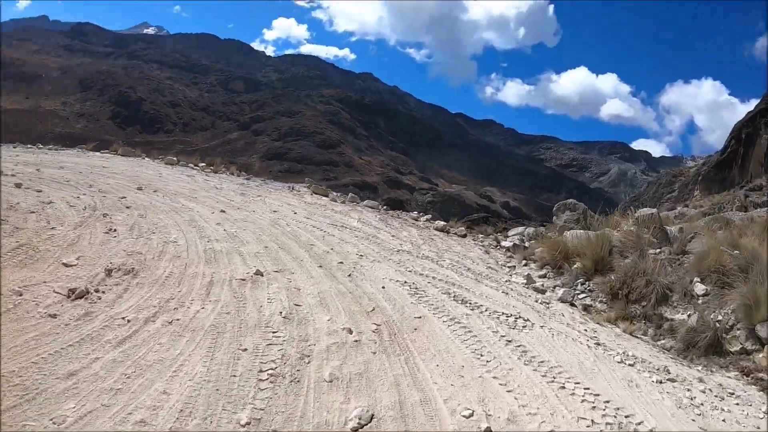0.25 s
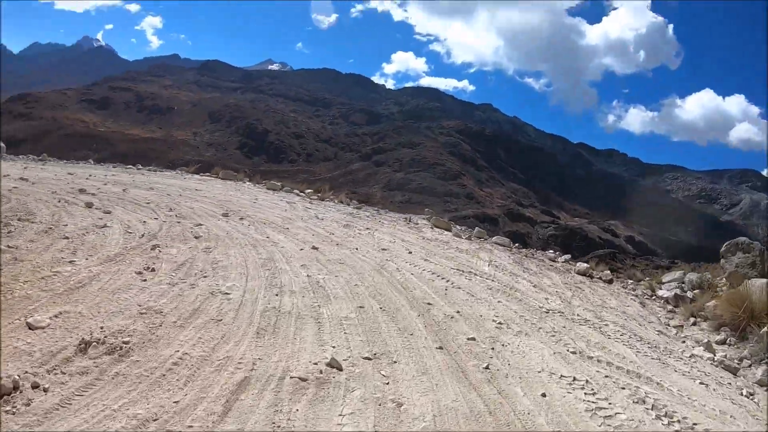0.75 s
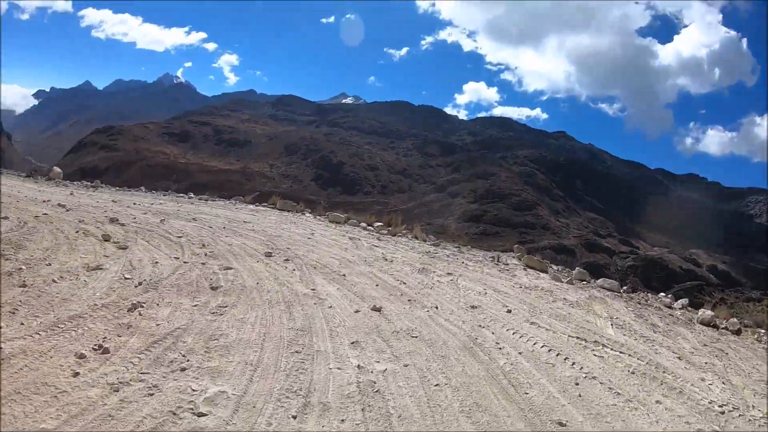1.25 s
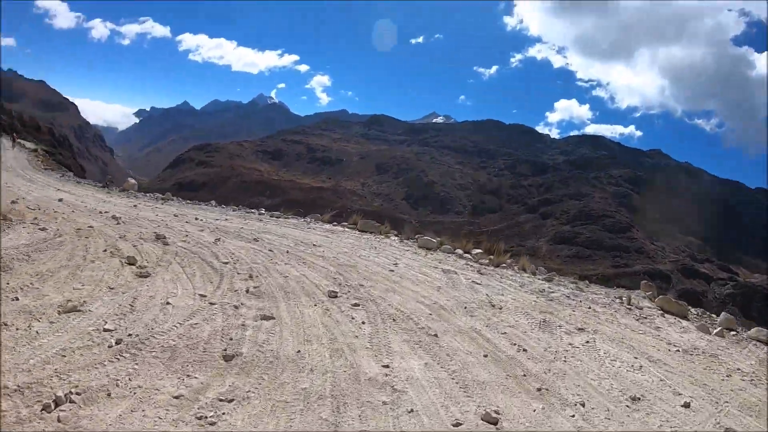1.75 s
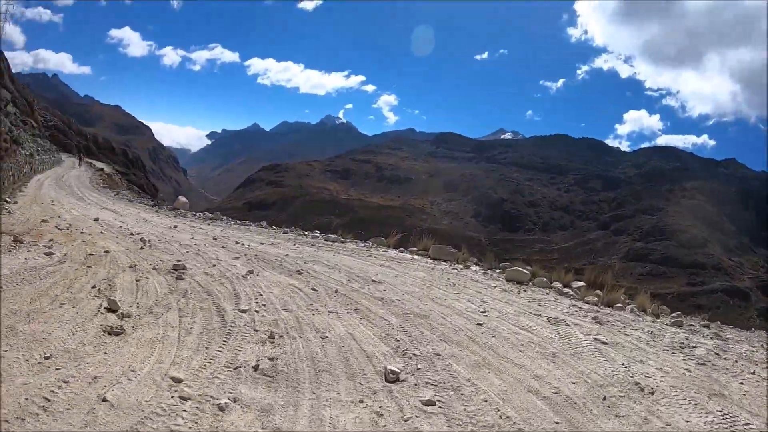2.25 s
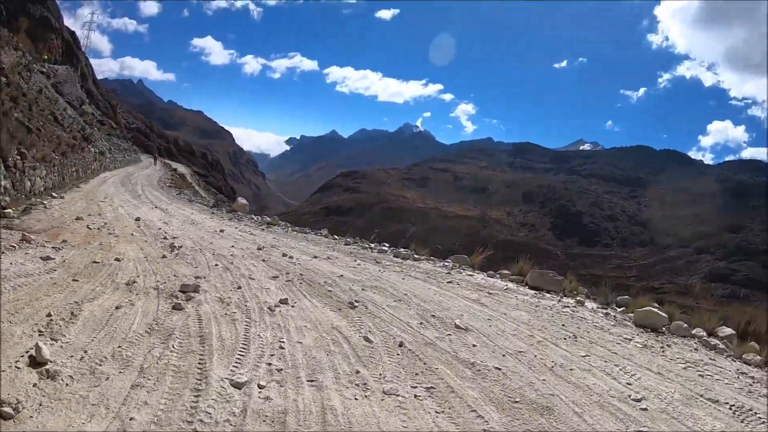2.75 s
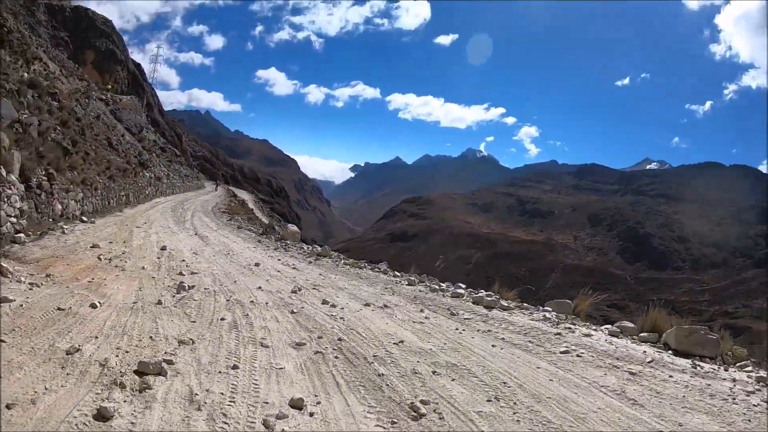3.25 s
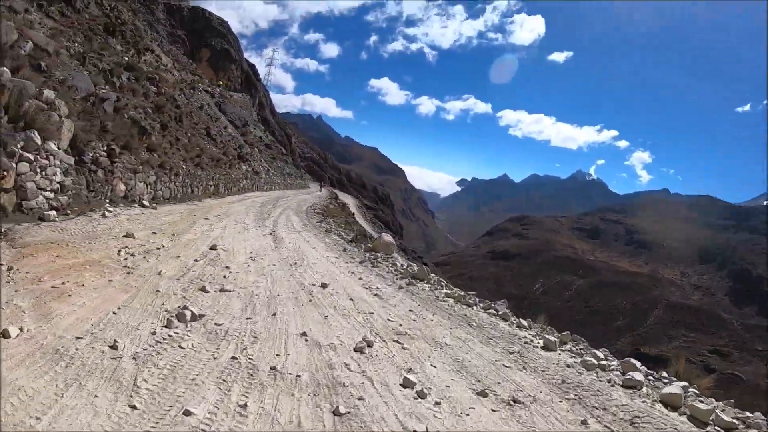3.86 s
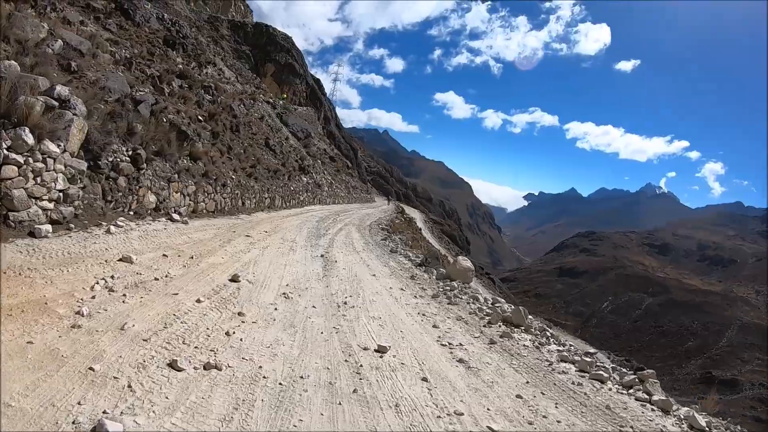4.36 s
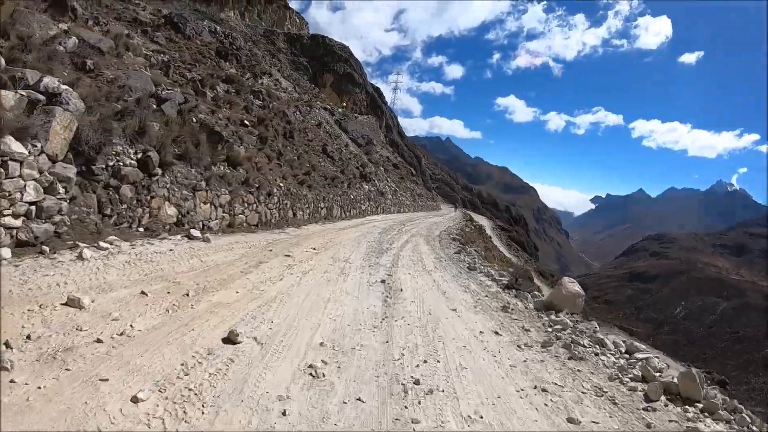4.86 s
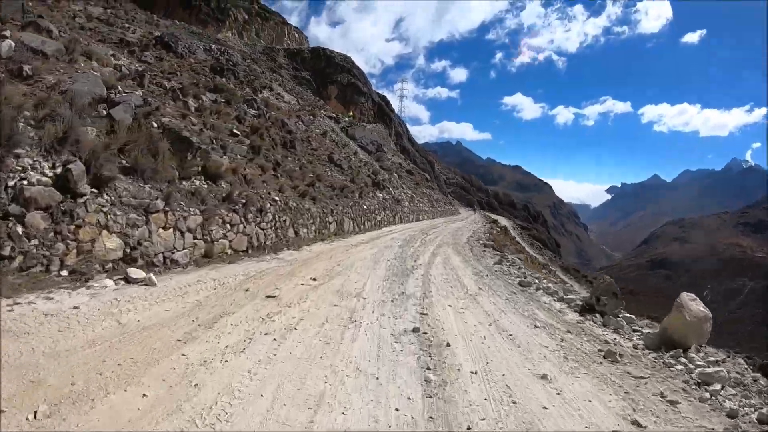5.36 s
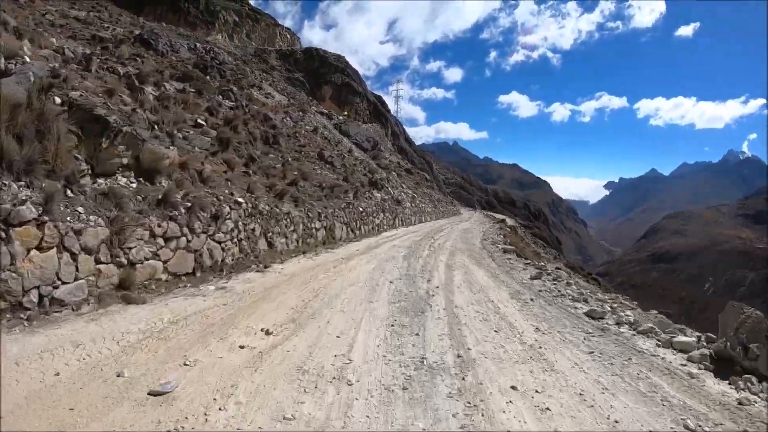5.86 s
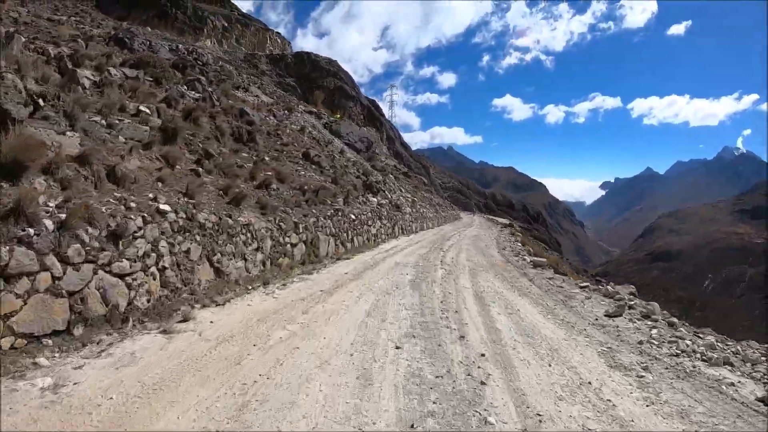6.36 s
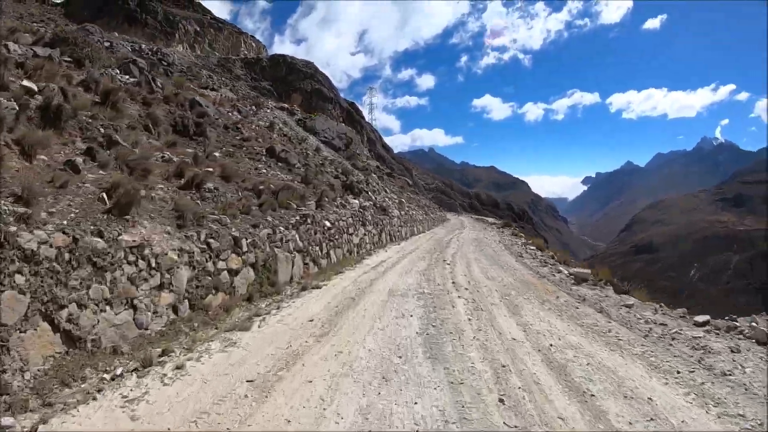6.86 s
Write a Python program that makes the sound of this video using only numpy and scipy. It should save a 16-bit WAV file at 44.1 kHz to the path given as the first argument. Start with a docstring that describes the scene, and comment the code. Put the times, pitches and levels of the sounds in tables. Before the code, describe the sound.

Dry, continuous gravel crunch under bicycle tyres, heard from a rider-mounted microphone on an open mountain road. Early on, brief narrow brake hisses and sharp stone clicks mix with hollow wheel ringing. Midway, bumps bring metallic knocks, bright ticks and low thumps, then a momentary cut in level. Afterwards the hollow roll recedes, tyres patter and sing faintly, and deep, ragged wind buffeting grows.

```python
"""Grit crunches, stones snap and wind rumbles as a mountain bike rounds a bend on loose gravel and rolls on
down the straight, heard close up from a camera microphone on the rider.
Grit, tread, wheels and frame are random contacts or single blows that excite resonances; the brake disc
hisses. Shaped noise makes the wind and the booming camera mount, and the wind grows more ragged with speed.
After the largest jolt the level dips briefly, with a click at each edge."""
import sys
import numpy as np
from scipy import signal
from scipy.fft import rfft, irfft, next_fast_len
from scipy.io import wavfile
from scipy.ndimage import uniform_filter1d, map_coordinates

SR = 44100
rng = np.random.default_rng(int(sys.argv[2]) if len(sys.argv) > 2 else 0)


def master(y):
    """Save y as 16-bit WAV."""
    cut = np.clip(np.atleast_2d(y).T, -1, 1)
    pcm = np.round(cut * 32767)  # scale
    wavfile.write(sys.argv[1], SR, pcm.astype(np.int16))


N = 313551
TIME = np.arange(N) / SR  # s

# how hard the tyres bite into the gravel, before the offsets below: (time [s], level [dB])
BITE = [(0.0, -40.5), (0.9, -38.5), (1.24, -44), (1.36, -37.5), (1.6, -41.5), (1.82, -39), (1.9, -41.5),
        (2.2, -37), (2.36, -41), (3.08, -39.5), (3.18, -42), (4.2, -41), (4.32, -42), (5.25, -41),
        (5.56, -39), (5.74, -38), (5.86, -38.5), (6.2, -41), (6.33, -36.5), (6.47, -39), (6.58, -37),
        (6.76, -39.5), (6.89, -35), (7.1, -35.5)]
# way out of the bend: (time [s], share of the straight [0-1])
STRAIGHT = [(3.9, 0.07), (4.6, 0.6)]
# loose stone (rise) or packed dirt (dip) under the tyres:
# (middle [s], length [s], change of crunch [dB], change of roll [dB])
LOOSE_PATCHES = [(0.86, 0.077, 2, 3), (1.247, 0.052, -1.5, -6.5), (1.425, 0.07, -1.5, -1.5),
                 (2.032, 0.017, 6.5, 7.5), (2.671, 0.015, 7, 6.5), (2.935, 0.04, -2.5, -8),
                 (3, 0.062, 3, 2), (3.137, 0.15, -0.5, 4), (3.663, 0.047, 3, 0.5), (3.79, 0.066, 1, 3),
                 (4.242, 0.038, 6.5, 2.5), (4.36, 0.3, -3, 2.5), (4.62, 0.03, 0.5, 3.5),
                 (4.672, 0.039, -5, -3), (5.015, 0.039, 2.5, 8.5), (5.688, 0.029, 4, 2),
                 (5.788, 0.04, 3.5, 7), (5.957, 0.034, 2.5, 5), (6.176, 0.023, 4, 8), (6.6, 0.04, 1, 4)]
CRUNCH_DB, STRAIGHT_CRUNCH_DB = -5, 1.5  # grit against the bite; added on the straight
ROLL_DB, STRAIGHT_ROLL_DB = -1, -12.5  # hollow roll against the bite; added on the straight

# spectrum of grit pushed sideways in the bend: (frequency [Hz], level [dB])
GRIT_BEND = [(250, -65), (900, -9), (1500, -8), (2050, 1), (2550, -1.5), (3350, -1.5), (3950, -2.5),
             (4500, -9), (6000, -14.5), (7700, -18), (8500, -31), (10500, -34.5), (12000, -41.5),
             (15000, -65)]
# spectrum of grit rolled over on the straight: (frequency [Hz], level [dB])
GRIT_STRAIGHT = [(250, -36.5), (900, 4), (1500, -4), (2150, 3), (2800, 0), (3400, -2), (3950, -7.5),
                 (4500, -14), (6000, -20.5), (7700, -30.5), (8500, -42), (10500, -42.5), (12000, -49.5),
                 (15000, -80.5)]

# ring of coarse stone chips: (frequency [Hz], relative level [dB])
CHIP_RING = [(1150, -8), (1567, -1.5), (1860, 0), (2170, 1.5), (2570, -4), (2950, 1), (3300, 5.5),
             (3750, 4)]
CHIP_T60_S = 0.017  # middle decay time, scattered from half to one and a half times this
CHIP_SPREAD_OCT, CHIP_SPREAD_DB = .09, 3.5  # scatter of pitch (either way) and of size
CHIP_DB, STRAIGHT_CHIP_DB = -4.5, -0.2  # chips against the crunch; added on the straight

CRACK_DB, CRACK_SPREAD_DB = 6.5, 2  # peak over the crunch before colouring, and its scatter
CRACK_HZ, CRACK_SPREAD_OCT = 1890, 0.77  # middle pitch, and its scatter either way
CRACK_RING = 0.34  # width of the ring as a share of its pitch

# spectrum of the drumming tread: (frequency [Hz], level [dB])
DRUMMING = [(120, -25.5), (380, 7.5), (700, 9.5), (1200, 5.5), (1700, 2.5), (3000, -36), (9000, -74)]
# hollow ring of the wheels: (frequency [Hz], width [Hz], level [dB])
WHEEL = [(242.5, 25, 10.5), (350, 70, -3.5), (452.4, 45, 3), (504.5, 30, 4.5), (604, 75, -3),
         (920, 220, -5), (1280, 80, -14), (1500, 390, -5.5), (1833, 140, -2)]
# share of a low ring that reaches the microphone: (frequency [Hz], level [dB])
RADIATION = [(100, -18.5), (220, -1), (2000, -3.5), (5000, -20.5), (9000, -39.5), (13000, -79.5)]
# bands in which the tyres sing on the straight: (frequency [Hz], width [Hz], level [dB])
TREAD = [(1660, 120, -5.5), (1920, 120, -7), (2124, 90, 0.5), (2600, 140, -3.5), (3310, 260, -4)]
TREAD_DB = -6.5  # singing against the crunch, at full straight

# pulls on the brake: (on [s], off [s], level [dB], disc pitch [Hz])
BRAKE = [(0, 0.323, -43.5, 1490), (0.458, 0.748, -45.5, 1506), (0.854, 1.045, -46.5, 1486),
         (1.322, 1.561, -45, 1497), (1.661, 1.779, -46, 1517), (2.239, 2.348, -45, 1506),
         (2.605, 3.086, -51.5, 1506), (3.59, 3.76, -46, 1459), (6.998, 7.098, -45, 1475)]
# singing of the rubbed disc, at the pitch DISC_HZ: (frequency [Hz], width [Hz], level [dB])
DISC = [(1410, 150, -7), (1488, 43, 4.5), (1557, 35, -.5), (3350, 150, -13), (3930, 100, -14)]
DISC_HZ = 1500
DISC_WANDER = .008  # share by which the pitch wavers with the pressure of the pads
BRAKE_FADE_S = 0.1  # the pads take this long to bite and to let go

# air stream over the microphone: (time [s], level [dB])
AIR = [(0, -41), (2.7, -38), (3.4, -34), (4.1, -31), (4.45, -33), (4.85, -35), (5.5, -34.5), (5.7, -27.5),
       (6.15, -30), (7.1, -29.5)]
# spectrum of the wind rumble: (frequency [Hz], level [dB])
RUMBLE = [(8, -41), (18, 6.5), (32, 9), (65, 5.5), (85, 3.5), (130, -21), (300, -58), (900, -110)]
# spectrum of the buffeting: (frequency [Hz], level [dB])
BUFFET = [(70, -10), (135, 4.5), (180, 0.5), (300, -5.5), (400, -12.5), (700, -25), (1500, -68),
          (6000, -95.5)]
# rushes of air, from gusts or from a bump's jerk:
# (peak time [s], length [s], rumble level [dB], buffeting level [dB], buffeting pitch [Hz])
GUSTS = [(0.812, 0.11, -29, -45, 178), (1.402, .08, -28, -43.5, 232.5), (2.201, .1, -30, -43.5, 230.5),
         (2.899, 0.023, -21, -31, 187.6), (2.976, 0.023, -26, -33, 225), (3.04, 0.048, -22, -50, 149),
         (3.12, 0.062, -27, -33, 260), (3.203, 0.048, -25, -37, 170), (3.74, 0.047, -23.5, -35, 169.6),
         (3.977, 0.057, -24, -29, 171), (4.171, 0.04, -36, -28, 192.5), (4.367, 0.038, -18, -35, 169),
         (4.58, 0.09, -38, -32, 195.2), (4.986, 0.12, -21.5, -36, 230.6), (5.099, 0.03, -24, -40, 257.6),
         (5.309, 0.23, -32, -29.5, 119.8), (5.668, 0.096, -27, -32.5, 210.4),
         (5.929, 0.13, -28, -35.5, 179), (6.304, 0.11, -29, -37, 180.6), (6.53, 0.21, -26, -35, 200.3),
         (7.052, 0.11, -31, -34, 190.7)]
AIR_REF_DB = -36
RUMBLE_DB, RUMBLE_GROWTH = -28.5, 0.51  # level at the reference air; dB gained per dB of air
BUFFET_DB, BUFFET_GROWTH = -41.5, 1.24  # likewise for the buffeting
GUST_HZ = 170  # pitch of the plain buffeting spectrum

# steady road shake of the camera mount, before a trim: (time [s], level [dB])
SHAKE = [(0.0, -23), (0.66, -27), (1.38, -24), (2.1, -29.5), (3.0, -24), (5.22, -24), (7.1, -19)]
# ruts that jolt the mount, before a trim: (peak time [s], length [s], level [dB])
JOLTS = [(.76, 0.052, -23.5), (1.42, 0.047, -16), (1.71, 0.023, -17.5), (2.92, 0.047, -14),
         (3.02, 0.14, -16.5), (4.185, 0.05, -12.5), (4.255, 0.025, -8.5), (4.36, 0.038, -16.5),
         (4.45, 0.046, -16.5), (4.73, 0.049, -19), (5.37, 0.034, -20), (5.66, 0.026, -17),
         (5.79, 0.032, -18), (5.905, 0.089, -18), (6.5, 0.03, -20), (6.36, 0.043, -21), (6.65, 0.029, -21),
         (6.85, 0.023, -13)]
MOUNT_HZ = 98
MOUNT_WANDER = 0.02535  # share by which the pitch gives as the mount flexes

# single low thumps on the microphone, from eddies or bumps: (time [s], envelope peak [dB], pitch [Hz])
THUMPS = [(.059, -29.5, 165), (.231, -17.5, 53), (0.359, -19, 45), (0.441, -14.5, 55), (1.211, -19, 51),
          (1.748, -12.5, 46), (2.148, -21, 60), (2.29, -20, 44), (2.851, -12, 55), (2.892, -21.5, 189),
          (2.971, -16.5, 204), (3.01, -12.5, 46), (3.127, -28, 184), (3.749, -15, 47), (4.157, -20, 225),
          (4.33, -14, 51), (4.357, -21.5, 147), (4.391, -12.5, 44), (4.499, -14, 55), (4.713, -20.5, 203),
          (4.745, -14.5, 50), (4.972, -13, 55), (5.048, -17, 58), (5.679, -34, 158), (5.781, -13, 47),
          (5.784, -19, 191), (6.046, -13.5, 50), (6.145, -13, 55), (6.566, -20, 161), (6.818, -22.5, 56),
          (7.045, -19, 59)]
THUMP_CYCLES = 0.89  # length at half height

# bumps that rattle the bike:
# (time [s], level [dB], top of the blow's spectrum [Hz], rattle t60 [s], pitch of the loose part [Hz])
KNOCKS = [(0.2173, -24.5, 2170, 0.052, 1210), (0.809, -31, 2400, 0.081, 915), (0.88, -33, 3000, 0.055, 475),
          (1.348, -42, 2500, 0.19, 463), (1.393, -33, 3500, 0.14, 500), (2.03, -40, 3000, 0.026, 800),
          (2.177, -30.5, 1000, 0.05, 674), (2.222, -33, 1000, 0.045, 686), (2.8896, -32, 3500, 0.03, 1160),
          (2.9658, -31.5, 2400, 0.025, 1090), (3.093, -42, 600, 0.094, 404), (3.135, -39, 600, 0.1, 370),
          (3.7452, -27, 5000, 0.082, 1106), (3.76, -29, 1900, 0.079, 720),
          (3.9818, -29.5, 8000, 0.052, 2680), (3.984, -32, 2500, 0.064, 1550),
          (4.011, -37.5, 895, 0.089, 480), (4.084, -35, 900, 0.025, 700), (4.1551, -23, 1580, 0.04, 1560),
          (4.1541, -32.5, 7000, 0.054, 2920), (4.158, -31, 600, 0.05, 460), (4.165, -31, 1600, 0.086, 1230),
          (5.651, -38, 1200, 0.053, 560), (5.692, -37, 2600, 0.052, 1230)]
# ring of the frame: (frequency [Hz], width [Hz], level [dB])
FRAME = [(244.4, 29, 17), (447, 65, 0), (566, 310, 9.5), (796, 69, -1), (1087, 110, 4), (1448, 98, 9),
         (1640, 270, -4), (1840, 80, 0), (2520, 270, -9), (3210, 230, 1), (3820, 280, -7), (4970, 330, -16),
         (6180, 1600, 2), (8200, 1500, -40)]
# sharp grit that hits the bike's metal: (time [s], peak [dB], pitch [Hz])
TICKS = [(.4165, -36, 6500), (.9143, -35, 7000), (1.1468, -39, 5800), (1.3932, -34, 7000),
         (1.8856, -38, 5500), (1.9947, -39, 4800), (2.8938, -34, 6000), (3.747, -32, 9000),
         (3.984, -37, 8500), (4.154, -32, 7800), (4.174, -34, 7500), (4.1827, -31.5, 7000),
         (4.2486, -34, 5970), (5.8496, -39, 6600)]
# larger stones flicked by the tyres: (time [s], peak [dB], pitch [Hz])
STONES = [(0.4336, -17, 3070), (0.6078, -19.5, 2870), (0.6153, -26.5, 2900), (0.796, -26, 1950),
          (0.818, -35, 2400), (0.826, -30, 1550), (0.838, -39, 1800), (0.861, -30, 1460),
          (0.877, -34, 3370), (0.882, -31.5, 1940), (1.1465, -30, 1310), (1.198, -37, 1285),
          (1.7643, -21, 2060), (1.767, -26, 3630), (2.1296, -26, 1740), (2.1745, -20.5, 2083),
          (2.177, -26, 3050), (2.1965, -23, 670), (2.209, -26, 2940), (2.241, -25, 1520),
          (2.4543, -27, 3160), (2.6716, -28, 3400), (2.984, -26, 1504), (3.355, -21, 2000),
          (3.361, -23, 1532), (3.746, -22, 3940), (4.0618, -25.5, 2330), (4.2325, -34, 2030),
          (4.506, -29.5, 1750), (4.835, -26, 2400), (4.9979, -26, 3530), (5.6705, -24, 1970),
          (5.776, -23.5, 1870), (5.955, -26, 2150), (6.0382, -24.5, 2130), (6.1664, -27.5, 1730),
          (6.3524, -25, 1588), (6.3945, -23, 2490), (6.5138, -23.5, 2450), (6.6093, -23, 1980),
          (6.656, -27, 1640)]
LEAD_S = .01  # scrape ahead of a contact
CHATTER_PER_S = 1000  # mean rate of the small contacts around a blow

# brief dip of the level: (start [s], end [s])
GAP_S = (4.284, 4.317)
GAP_DB, EDGE_CLICK_DB = -42, -29.5  # level in the dip; click at each edge, before the top is cut
TOP_HZ, END_FADE_S = 15700, .015


def undb(db):
    """Decibels to gain."""
    return 10 ** (np.asarray(db) / 20)


def unit(x):
    """Scale to rms 1."""
    return x / np.sqrt(np.mean(x ** 2))


def curves(table):
    """The columns of a table, joined by straight lines in time."""
    s, *columns = np.transpose(table)
    return [np.interp(TIME, s, c) for c in columns]


def colour(x, points):
    """Causal filter with a (Hz, dB) response, by way of the cepstrum."""
    size = 2 * next_fast_len(len(x) // 2 + 1024)
    hz, db = np.transpose(points)
    f = np.maximum(np.arange(size // 2 + 1) * SR / size, 1)
    cepstrum = irfft(np.log(undb(np.interp(np.log(f), np.log(hz), db))))
    # folding the cepstrum forward gives minimum phase
    cepstrum[1:size // 2] *= 2
    cepstrum[size // 2 + 1:] = 0
    return irfft(rfft(x, size) * np.exp(rfft(cepstrum)))[:len(x)]


def resonate(x, hz, width_hz):
    """One resonance, gain 1 at its centre."""
    return signal.lfilter(*signal.iirpeak(hz, hz / min(width_hz, SR / 4), fs=SR), x)


def resonate_twice(x, hz, width_hz, second_width_hz):
    """Two resonances in a row at one pitch, for steeper skirts."""
    return resonate(resonate(x, hz, width_hz), hz, second_width_hz)


def body(x, modes):
    """A set of resonances struck at the same point."""
    return sum(undb(db) * resonate(x, hz, width) for hz, width, db in modes)


def walk(rate):
    """Random levels held 1 / rate s and slewed; rms 1."""
    k = max(int(SR / rate), 2)
    levels = np.repeat(rng.standard_normal(N // k + 1), k)
    return unit(uniform_filter1d(levels, k)[:N])


def clicks(per_s, spread_db):
    """Random contacts of scattered size and either sign, rms 1."""
    size = undb(spread_db * np.minimum(rng.exponential(size=N), 5))
    happens = rng.random(N) < per_s / SR
    return unit(happens * size * rng.choice([-1, 1], N))


def bell(s, length):
    """A smooth swell around time s; the length is its width at half height."""
    return .5 ** ((2 * (TIME - s) / length) ** 2)


def swells(table):
    """Amplitude of the swells (s, length, dB, ..) in a table, their powers added."""
    return np.sqrt(sum(undb(2 * db) * bell(s, length) for s, length, db, *_ in table))


def waver(x, depth, rate):
    """Let the pitch of a sound wander by a share, rate times a second."""
    position = np.cumsum(1 + depth * walk(rate=rate))
    return map_coordinates(x, [position], order=3, mode="mirror")


def add(out, s, sound):
    """Mix a sound in at time s."""
    i = int(max(s, 0) * SR)
    out[i:i + len(sound)] += sound[:len(out) - i]


def strike(t, t60, scatter):
    """One hard contact at t = 0 between a brief scrape and a dying chatter of relative strength scatter."""
    contacts = (rng.random(len(t)) < CHATTER_PER_S / SR) * rng.choice([-1, 1], len(t))
    contacts = contacts + 0.04 * rng.standard_normal(len(t))
    # the scrape rises faster than the chatter falls
    fade = undb(-60 * np.maximum(t, -t / 0.22) / t60)
    chatter = contacts * fade * (np.abs(t) > .001)
    push = scatter * chatter / np.linalg.norm(chatter)
    push[np.argmin(np.abs(t))] += 1
    return push


def gravel(crunch_db, straight, patches):
    """Grit cracks under the tread; each size of pebble chinks in its own range, over the hiss of sand."""
    pebbles = 0
    for hz in np.geomspace(1000, 9000, num=8):
        chink = resonate(clicks(per_s=800, spread_db=2.5), hz, hz * 0.31)
        pebbles = pebbles + np.sqrt(hz) * unit(chink)
    sand = undb(2.0) * rng.standard_normal(N)
    grit = unit(pebbles) * patches + sand
    bend = unit(colour(grit, GRIT_BEND))
    ahead = unit(colour(grit, GRIT_STRAIGHT))
    return ((1 - straight) * bend + straight * ahead) * undb(crunch_db)


def chips(crunch_db, straight, count):
    """Coarser chips click against each other, each a short decaying sine with its own pitch and size."""
    out, t = np.zeros(N), np.arange(SR // 40) / SR
    for when, kind, size, pitch, ring in rng.random((count, 5)):
        hz, db = CHIP_RING[int(kind * len(CHIP_RING))]
        hz = hz * 2 ** (CHIP_SPREAD_OCT * (2 * pitch - 1))
        db = db - CHIP_SPREAD_DB * np.log(size + 0.078)
        decay = undb(-60 * t / (CHIP_T60_S * (.5 + ring)))
        onset = 1 - np.exp(-2 * hz * t)
        add(out, when * TIME[-1], undb(db) * decay * onset * np.sin(2 * np.pi * hz * t))
    level_db = crunch_db + CHIP_DB + STRAIGHT_CHIP_DB * straight
    return unit(colour(out, RADIATION)) * undb(level_db)


def cracks(crunch_db, count):
    """Single grains split under the tread, each an impulse through a broad resonance: a few dry cycles."""
    out, impulse = np.zeros(N), signal.unit_impulse(SR // 100)
    for when, size, pitch in rng.random((count, 3)):
        hz = np.clip(CRACK_HZ * 2 ** (2 * CRACK_SPREAD_OCT * (pitch - .5)), 400, 4500)
        crack = resonate_twice(impulse, hz, hz * CRACK_RING, hz * 1.2)
        db = crunch_db[int(when * N)] + CRACK_DB - CRACK_SPREAD_DB * np.log(size + 0.043)
        add(out, when * TIME[-1], undb(db) * crack / np.abs(crack).max())
    return colour(out, [(3800, -1), (5000, -9), (7700, -15.5), (8700, -29), (13000, -47)])


def tyres(roll_db, straight, patches):
    """The tread drums over small stones; leaning in the bend, it rings the wheels more."""
    contacts = clicks(per_s=1800, spread_db=-1.0) * np.sqrt(patches)
    drumming = unit(colour(contacts, DRUMMING))
    ring = 0
    for hz, width, db in WHEEL:
        # each wheel resonance is fed by its own tread blocks
        blocks = clicks(per_s=2500, spread_db=2.5)
        ring = ring + undb(db) * resonate_twice(blocks, hz, width, 4 * width)
    ring = unit(colour(ring, RADIATION))
    return (undb(-4.0 + 2 * straight) * drumming + undb(-10 * straight) * ring) * undb(roll_db)


def tread(crunch_db, straight):
    """Knobs patter on the grit and the tyre sings in narrow bands, each coming and going, on the straight."""
    ring = 0
    for hz, width, db in TREAD:
        level = undb(db + 2.5 * walk(rate=9))
        patter = clicks(per_s=1500, spread_db=3.0)
        ring = ring + level * resonate_twice(patter, hz, width, 4 * width)
    return unit(ring) * straight * undb(crunch_db + TREAD_DB)


def brake():
    """The pads rub the disc at each pull, a narrow hiss just short of a squeal, its pitch set pull by pull."""
    rub = 0
    for hz, width, db in DISC:
        rub = rub + undb(db) * resonate_twice(rng.standard_normal(N), hz, width, 4 * width)
    pulls = []
    for on, off, db, _ in BRAKE:
        inside_s = np.minimum(TIME - on, off - TIME)  # negative outside the pull
        pulls.append(undb(db) * np.clip(1 + inside_s / BRAKE_FADE_S, 0, 1))
    pulls = np.array(pulls)
    # the strongest pull sets the pitch
    pitch = np.array(BRAKE)[pulls.argmax(axis=0), 3] / DISC_HZ
    rub = map_coordinates(rub, [np.cumsum(pitch)], order=3, mode="mirror")
    rub = unit(waver(rub, DISC_WANDER, rate=12))
    return rub * pulls.max(axis=0) * undb(0.9 * walk(rate=14.0))


def wind(air_db):
    """Big eddies rumble on the microphone, small ones tear off in puffs; both grow with air and gusts."""
    over_db = air_db - AIR_REF_DB
    steady = undb(RUMBLE_DB + RUMBLE_GROWTH * over_db + .8 * walk(rate=12))
    eddies = np.hypot(steady, swells(GUSTS))
    rumble = unit(colour(rng.standard_normal(N), RUMBLE))
    ragged = rng.standard_normal(N) * undb(2.3 * walk(rate=26) + 1.8 * walk(rate=11))
    buffeting = unit(colour(ragged, BUFFET)) * undb(BUFFET_DB + BUFFET_GROWTH * over_db)
    out = rumble * eddies + buffeting
    # each gust sheds eddies of its own size: slow ones drone low, sharp ones tear higher
    puffs = unit(colour(rng.standard_normal(N), BUFFET))
    for s, length, _, db, hz in GUSTS:
        near = np.abs(TIME - s) < 3 * length
        # reading the puffs faster or slower shifts their pitch
        position = (s + (TIME[near] - s) * hz / GUST_HZ) * SR
        gust = map_coordinates(puffs, [position], order=1, mode="mirror")
        out[near] += gust * undb(db) * np.sqrt(bell(s, length)[near])
    return out


def mount(shake_db):
    """Road shake keeps the camera mount booming at its one low resonance; ruts make it swell."""
    boom = resonate_twice(rng.standard_normal(N), MOUNT_HZ, 14.9, 36)
    boom = unit(waver(boom, MOUNT_WANDER, rate=14))
    # the boom is levelled against its own slow envelope, so its random swells come out more even
    slow_envelope = np.sqrt(uniform_filter1d(boom ** 2, int(.09 * SR)) + 0.053)
    shake = undb(shake_db - 5.0 + 2.45 * walk(rate=14))
    jolts = undb(-3.5) * swells(JOLTS)
    return unit(boom / slow_envelope) * np.hypot(shake, jolts)


def thumps():
    """Single low thumps on the microphone, from eddies or bumps; the higher the pitch, the shorter the thump."""
    out, t = np.zeros(N), np.arange(-SR // 10, SR // 10) / SR
    for s, db, hz in THUMPS:
        swing = np.cos(2 * np.pi * (hz * t + rng.random()))
        envelope = .5 ** ((2 * t * hz / THUMP_CYCLES) ** 2)
        add(out, s + t[0], undb(db) * swing * envelope)
    return out


def knocks():
    """A bump throws a loose part against the frame and both ring."""
    out, t = np.zeros(N), np.arange(SR // 6) / SR - LEAD_S
    for s, db, top_hz, t60, part_hz in KNOCKS:
        # the longer a rattle lasts, the more of the blow goes into chatter
        push = strike(t, t60, scatter=22 * t60)
        ring = body(push, FRAME + [(part_hz, part_hz * 0.18, 5.5)])
        # small hard parts give bright blows with little bass
        ring = colour(ring, [(top_hz / 40, -14), (top_hz / 9, 0), (top_hz, 0), (2 * top_hz, -14), (8 * top_hz, -36)])
        ring = colour(ring, [(4000, 15.5), (7500, -1.0), (11000, -11), (14000, -32.0)])
        # the level is that of the first instant after the contact
        first = (t > 0) & (t < LEAD_S)
        add(out, s - LEAD_S, ring * undb(db) / ring[first].std())
    return out


def ticks():
    """Sharp grit hits the metal of the bike with a thin, bright tick."""
    out, t = np.zeros(N), np.arange(SR // 25) / SR - LEAD_S
    for s, db, hz in TICKS:
        tick = resonate(strike(t, t60=0.013, scatter=0.92), hz, hz * .35)
        tick = colour(tick, [(2000, -13), (5000, 8), (8000, -2.5), (11000, -18.5), (12500, -22), (15000, -46)])
        add(out, s - LEAD_S, tick * undb(db) / np.abs(tick).max())
    return out


def stones():
    """A stone snaps out from under the tyre and rings for a few cycles."""
    out, t = np.zeros(N), np.arange(SR // 20) / SR - LEAD_S
    for s, db, hz in STONES:
        push = strike(t, t60=0.03, scatter=0.8)
        snap = resonate_twice(push, hz, hz * 0.25, hz * 1.7)
        snap = colour(snap, [(4000, 2.5), (7600, -18.0), (9000, -21.5), (12000, -35.5), (14000, -51.0)])
        add(out, s - LEAD_S, snap * undb(db) / np.abs(snap).max())
    return out


def scene():
    """Road, bike and air together, as they reach the rider."""
    straight = np.clip(curves(STRAIGHT)[0], 0, 1)
    # the bite wavers as the bike bobs on the uneven road
    bite_db = curves(BITE)[0] + .5 * walk(rate=13)
    crunch_db = bite_db + CRUNCH_DB + STRAIGHT_CRUNCH_DB * straight
    roll_db = bite_db + ROLL_DB + STRAIGHT_ROLL_DB * straight + 1.0 * walk(rate=12)
    for s, length, crunch_rise_db, roll_rise_db in LOOSE_PATCHES:
        crunch_db = crunch_db + crunch_rise_db * bell(s, length)
        roll_db = roll_db + roll_rise_db * bell(s, length)
    # finer and coarser grit pass under the tyres, merging into a denser roar on the straight
    patches = undb((2.5 - 0.55 * straight) * np.minimum(walk(rate=90), 1.5))
    road = gravel(crunch_db, straight, patches) + chips(crunch_db, straight, count=2600)
    road = road + cracks(crunch_db, count=650) + stones()
    bike = tyres(roll_db, straight, patches) + tread(crunch_db, straight)
    bike = bike + brake() + knocks() + ticks()
    microphone = wind(curves(AIR)[0]) + thumps() + mount(curves(SHAKE)[0])
    return (road + bike + microphone)[None]


def record(dry):
    """The level dips briefly after the largest jolt, with a click at each edge; the top is cut."""
    in_gap = (TIME > GAP_S[0]) & (TIME < GAP_S[1])
    live = uniform_filter1d(np.where(in_gap, undb(GAP_DB), 1), size=24)
    live = live * np.clip((TIME[-1] - TIME) / END_FADE_S, 0, 1)
    edges = np.zeros(N)
    for s in GAP_S:
        add(edges, s, undb([EDGE_CLICK_DB]))
    low_pass = signal.ellip(8, .2, 70, TOP_HZ, fs=SR, output="sos")
    return signal.sosfilt(low_pass, dry * live + edges)


dry = scene()
out = record(dry)
master(out)
```